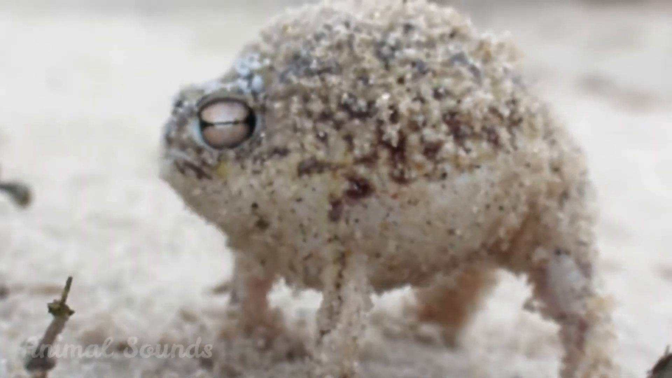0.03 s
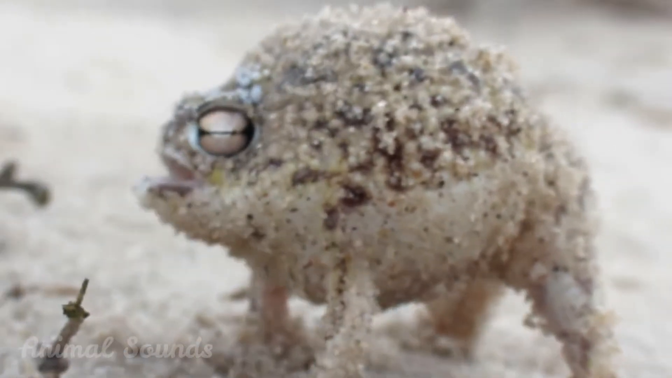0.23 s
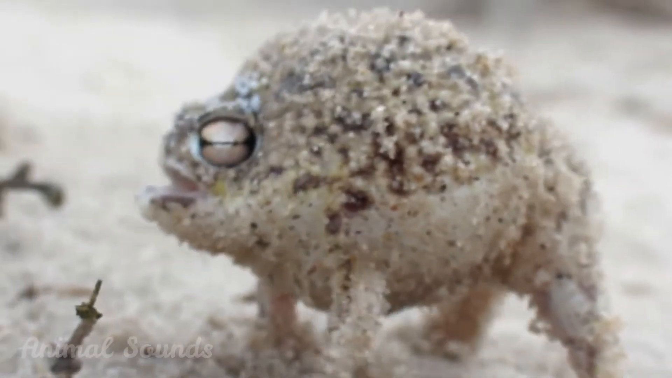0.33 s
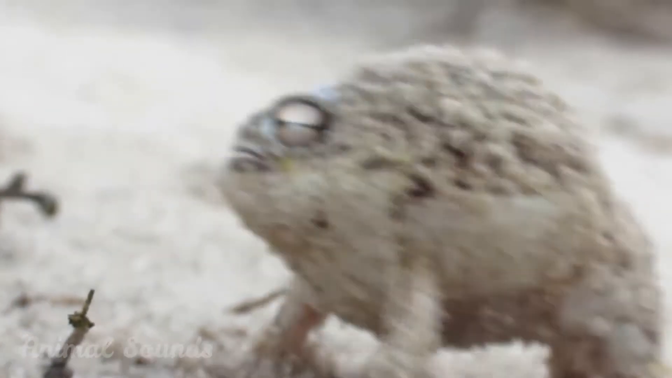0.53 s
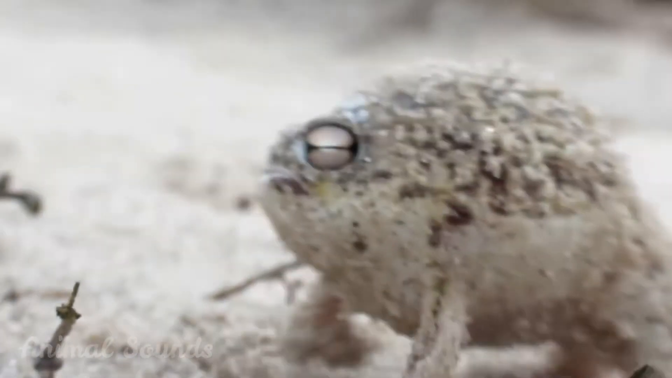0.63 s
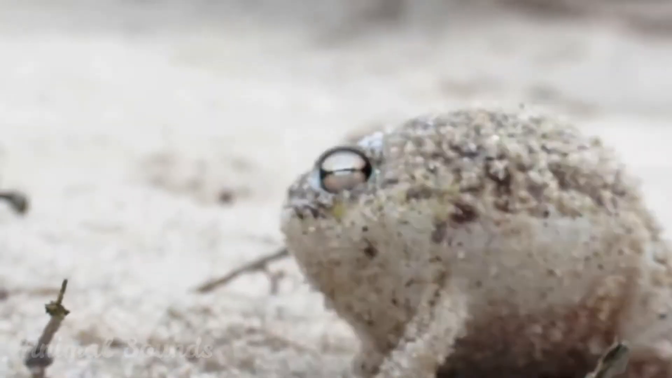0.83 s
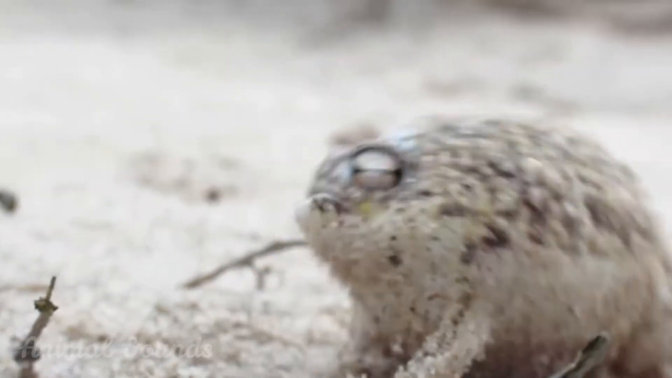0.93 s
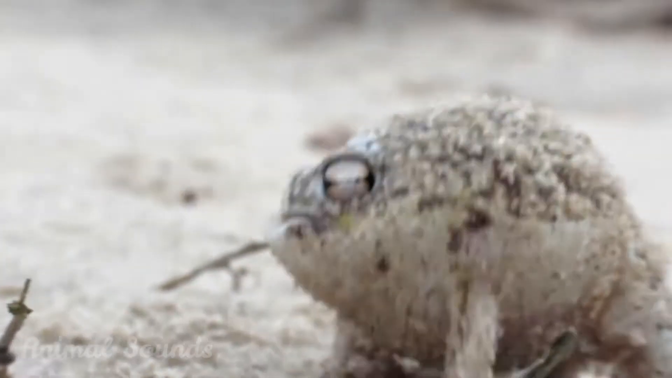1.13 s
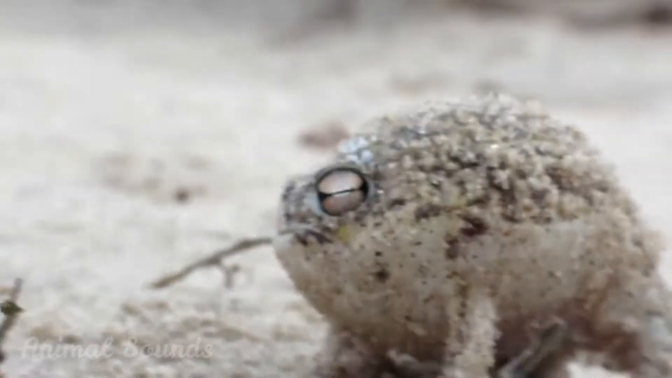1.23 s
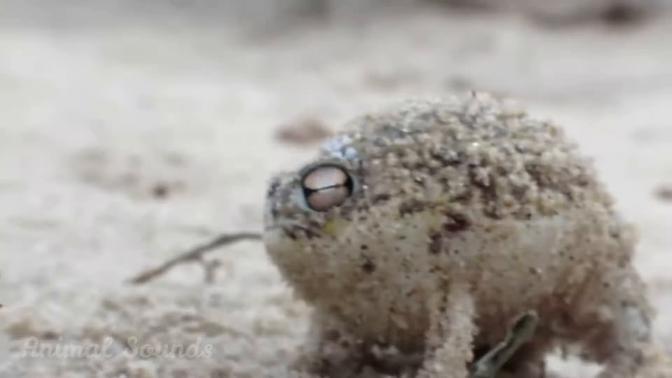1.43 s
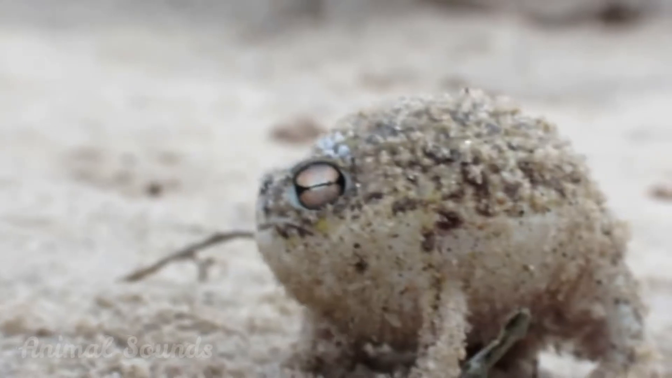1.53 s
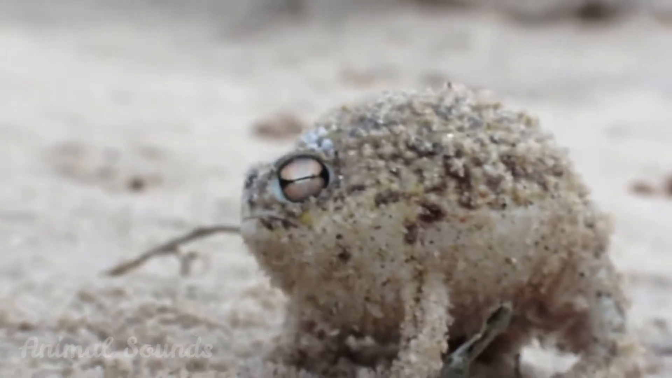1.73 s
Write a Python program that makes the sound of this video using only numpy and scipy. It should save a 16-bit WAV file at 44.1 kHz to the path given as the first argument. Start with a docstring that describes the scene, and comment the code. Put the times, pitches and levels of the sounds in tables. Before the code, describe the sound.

Squeaky-toy cries from a small frog close by: one long, one short, over faint air.

```python
"""Wind thumps on a pair of microphone ports, mostly in opposition, over a far wash of air.
A small frog on open sand, close to the ports, gives a long squeak and then a short one.
Steady vocal pulses ring a narrow mouth resonance that sinks as the mouth closes.
Each squeak ends in a rasp; faint clicks, bursts of noise ringing three resonances, come last."""
import sys
import numpy as np
from scipy import signal
from scipy.fft import rfft, irfft
from scipy.io import wavfile
from scipy.ndimage import uniform_filter1d, minimum_filter1d

SR = 44100
rng = np.random.default_rng(int(sys.argv[2]) if len(sys.argv) > 2 else 0)


def linear_from_db(decibels):
    """Turn decibels (scalar or array-like) into linear amplitude factors; 0 gives 1."""
    return 10 ** (np.asarray(decibels, float) / 20)


def store_pcm(level_fs):
    """Save levels as 16-bit WAV."""
    pcm = np.round(np.clip(level_fs, -1, 1) * 32767).astype(np.int16)
    wavfile.write(sys.argv[1], SR, np.atleast_2d(pcm).T)


N = 77175

# Pulse rate of the vocal folds. Each row: time in seconds, pitch in Hz.
LONG_SQUEAK_PITCH = [(.193, 1475), (.199, 1480), (.204, 1137), (.21, 1043), (.22, 1046), (.244, 1167),
                     (.265, 1218), (.315, 1255), (.34, 1234), (.38, 1178), (.528, 924.4), (.56, 919.7),
                     (.6, 893.3), (.65, 817), (.69, 822.4), (.715, 810.4), (.74, 723), (.765, 661),
                     (.815, 629)]
SHORT_SQUEAK_PITCH = [(1.023, 1138), (1.028, 1317), (1.035, 1325), (1.044, 893), (1.066, 921.3),
                      (1.085, 989.7), (1.11, 1027), (1.14, 1040), (1.17, 1023), (1.2, 950.7), (1.23, 821.7),
                      (1.26, 647.4), (1.285, 621.4), (1.295, 402.3), (1.35, 206)]
# Vocal effort. Each row: time in seconds, relative level in dB, roughness in dB.
VOCAL_EFFORT = [(0.191, -34.5, -2), (.22, -37, -40), (.3, -39, -48), (.6, -39.5, -48), (0.721, -41.5, -42),
                (0.77, -45.5, -32), (.784, -53, 3), (0.816, -64., 3), (1.02, -33.5, -18),
                (1.051, -38.5, -34), (1.14, -35.5, -50), (1.199, -39.5, -42), (1.279, -41, -34),
                (1.297, -45, -13), (1.35, -65, -13)]
# Mouth shape. Each row: time in seconds, resonance in Hz, its gain in dB, opening as treble gain in dB.
MOUTH_SHAPE = [(.19, 6040, -11, -6), (.205, 7020, 11, -2), (0.217, 7375, 27, -1), (.27, 7250, 27.5, -1.5),
               (0.329, 7555, 27.5, 0), (0.402, 7160, 30, -1.5), (0.469, 7155, 21, 5.5),
               (0.516, 6820, 22.5, 3), (0.562, 6370, 24, 0.5), (0.602, 6140, 24, 4.5),
               (0.639, 5590, 25.5, -5), (0.673, 4760, 19.5, -6), (.677, 4270, -14, 5),
               (0.681, 3430, 16.5, -7.5), (0.723, 3130, -0.5, -5.5), (0.788, 1910, 7, -18.5),
               (1.022, 3930, -6.5, -31), (1.037, 3970, 14.5, -10.5), (1.045, 5310, 21, -9),
               (1.061, 6960, 18.5, 5.5), (1.082, 7350, 30, -2), (1.109, 7350, 28.5, 1),
               (1.144, 7200, 22.5, 3), (1.17, 6435, 28, -2), (1.226, 5860, 25.5, -13.5),
               (1.279, 4870, 19, -24), (1.286, 3350, 13.5, -14), (1.31, 2473, 14, -30.5),
               (1.347, 1530, 5, -40)]
# Sound through the body wall. Each row: frequency in Hz, gain in dB.
BODY_GAIN = [(1000, -14.5), (1700, 1.5), (2500, -1.5), (3600, 2.5)]
# Sound through the open mouth. Each row: frequency in Hz, gain in dB before the opening's gain.
OPEN_MOUTH_GAIN = [(3000, -31.5), (6000, 5.5), (8500, -7.5), (9600, -13.5), (12500, -7.5), (14000, -8.5),
                   (15700, 0.5)]
# Pitches that cancel on the way to the ports. Each row: centre in Hz, width in Hz, gain in dB.
PATH_NOTCHES = [(4367, 750, -24.5), (6750, 560, -9), (11370, 400, -11.5)]
# Small mouth or sand clicks. Each row: time in seconds, level in dB of the noise before it rings.
CLICKS = [(1.348, -42), (1.364, -48.5), (1.380, -48), (1.413, -47), (1.467, -43.5)]
# Resonances the clicks ring. Each row: centre in Hz, width in Hz, gain in dB.
CLICK_RESONANCES = [(2105, 110, 21.5), (5000, 660, 3), (6600, 1200, -4.5)]
# Level difference of the ports. Each row: frequency in Hz, left over right in dB.
PORT_LEVEL_DIFFERENCE = [(1500, -1.5), (3200, 2), (9000, -0.5), (13000, -1)]
# Phase difference of the ports. Each row: frequency in Hz, lead of the left in radians.
PORT_PHASE_LEAD = [(1500, 0.015), (3500, 0.86), (5000, 0.25), (7550, 0.43), (8600, 1.45), (15000, .7)]
# Wind puffs on the ports. Each row: time of the peak in seconds, level in dB.
WIND_PUFFS = [(0.029, -15.5), (0.207, -30), (.405, -30), (0.519, -30.5), (0.591, -30.5), (0.651, -29),
              (0.699, -27.5), (0.761, -26.5)]
# Spectral shapes of wind and air. Each row: frequency in Hz, relative density in dB per Hz.
WIND_SPECTRUM = [(15, 7), (45, 3.5), (130, -2), (300, -17), (900, -60.5)]
AIR_SPECTRUM = [(30, -9.5), (75, -3.5), (117, -5), (286, -8), (2100, -28.5), (15800, -46)]
# Likeness of the air in the two ports. Each row: frequency in Hz, left-right correlation.
AIR_CORRELATION = [(60, -0.19), (240, 0.63), (950, 0.12), (15000, 0.09)]

ONSET_S, FADE_S = .002, .012
JITTER = .0004   # rms share of the pitch
CROAK_RAD = 0.82   # rms phase wander of the fundamental at 0 dB roughness
ROUGH_DB_PER_OCTAVE = 14.
FLICKER_DB = 2.0   # rms at 10 kHz, in proportion to frequency
MOUTH_WIDTH_HZ = 238.6
BODY_TOP_HZ, BODY_TOP_SHARE = 4960, 1.07   # upper limit of the body's band; share of the mouth's resonance
THROAT_SHARE, THROAT_WIDTH_HZ, THROAT_DB = 0.803, 2600, 5.5   # share of the mouth's resonance
CLICK_DECAY_S = 0.00095
PUFF_S = .016   # standard deviation of the bell-shaped swell
SHARED_DB = -10.   # wind alike in both ports, relative to the opposed part
AIR_DB, AIR_PATCHY_DB = -49, .6   # level of the part alike in both ports; rms of its slow change
MASK_DB, MASK_REACH_HZ = -35, 750   # threshold under the strongest bin; reach to either side
MASK_LOW_HZ, MASK_TOP_HZ = 1100, 5000
STOP_HZ = 16300.   # attenuation reaches 60 dB here


def at_hz(points, hz):
    """Interpolation on a logarithmic frequency axis, the natural scale of pitch."""
    p = np.array(points)
    return np.interp(np.log(np.maximum(hz, 1)), np.log(p[:, 0]), p[:, 1])


def rms_one(x):
    """Normalisation: division by the root mean square gives unit power."""
    return x / np.sqrt(np.mean(x ** 2) + 1e-20)


def drift(rate_hz, size):
    """Slow random variation: white noise through two equal one-pole low-passes, rms 1."""
    settle = SR // 2
    pole = np.exp(-2 * np.pi * rate_hz / SR)
    noise = rng.standard_normal(size + settle)
    return rms_one(signal.lfilter([1], [1, -2 * pole, pole * pole], noise)[settle:])


def resonance(hz, centre_hz, width_hz):
    """Damped resonator: complex gain of one mode, unity at its centre."""
    return 1 / (1 + 1j * (hz ** 2 - centre_hz ** 2) / (hz * width_hz))


def glide(t, rows):
    """Continuous motion: table columns interpolated in time and averaged over 4 ms."""
    s, *columns = np.transpose(rows)
    return [uniform_filter1d(np.interp(t, s, c), size=180, mode="nearest") for c in columns]


def vocal_tract(hz, mouth_hz, mouth_db, open_db):
    """Parallel radiation: body wall, mouth, open mouth and throat add, then path notches cancel."""
    body_top_hz = np.minimum(BODY_TOP_HZ, BODY_TOP_SHARE * mouth_hz)
    body = linear_from_db(at_hz(BODY_GAIN, hz)) / (1 + (hz / body_top_hz) ** 6)
    mouth = linear_from_db(mouth_db) * resonance(hz, mouth_hz, MOUTH_WIDTH_HZ)
    mouth = mouth / (1 + (hz / (2 * mouth_hz)) ** 6)
    open_mouth = linear_from_db(open_db + at_hz(OPEN_MOUTH_GAIN, hz))
    throat = resonance(hz, THROAT_SHARE * mouth_hz, THROAT_WIDTH_HZ) ** 2
    tract = body + mouth + open_mouth + linear_from_db(THROAT_DB + open_db) * throat
    for notch_hz, width_hz, notch_db in PATH_NOTCHES:
        tract *= 1 - (1 - linear_from_db(notch_db)) * np.abs(resonance(hz, notch_hz, width_hz)) ** 2
    return tract


def squeak(pitch_rows):
    """Source and filter: harmonics of the pulse rate pass the tract; roughness spreads noise around each."""
    start, end = int(pitch_rows[0][0] * SR), int(pitch_rows[-1][0] * SR)
    t = np.arange(start, end) / SR
    size = len(t)
    pitch, = glide(t, pitch_rows)
    f0 = pitch * (1 + JITTER * drift(72.0, size))
    mouth_hz, mouth_db, open_db = glide(t, MOUTH_SHAPE)
    level_db, rough_db = glide(t, VOCAL_EFFORT)
    ramp = np.minimum((t - t[0]) / ONSET_S, (t[-1] - t) / FADE_S)
    gain = 2 * linear_from_db(level_db) * np.clip(ramp, 0, 1)

    # Pulses come early or late when the voice is rough.
    uneven = CROAK_RAD * linear_from_db(rough_db) * drift(220.0, size)
    phase = 2 * np.pi * np.cumsum(f0) / SR + uneven
    out = np.zeros(N)
    for k in range(1, 36):
        hz = k * f0
        tract = vocal_tract(hz, mouth_hz, mouth_db, open_db)
        flicker = linear_from_db(FLICKER_DB * hz / 1e4 * drift(25., size))
        spread = linear_from_db(np.minimum(rough_db + ROUGH_DB_PER_OCTAVE * np.log2(hz / 3000), 0))
        rasp = spread * (drift(500., size) + 1j * drift(500., size))
        harmonic = np.real(gain * tract * (flicker + rasp) * np.exp(1j * k * phase))
        out[start:start + size] += harmonic * (hz < .4 * SR)
    return out


def ticks():
    """Impulsive excitation: noise that starts abruptly and dies at once rings three resonances."""
    t = np.arange(N) / SR
    hz = np.fft.rfftfreq(N, 1 / SR) + 1   # 1 Hz up avoids division by zero
    level = sum(linear_from_db(db) * (t > s) * np.exp(-np.abs(t - s) / CLICK_DECAY_S) for s, db in CLICKS)
    rings = sum(linear_from_db(db) * resonance(hz, centre_hz, width_hz)
                for centre_hz, width_hz, db in CLICK_RESONANCES)
    return irfft(rfft(level * rng.standard_normal(N)) * rings, N)


def at_ports(x):
    """Spaced reception: two ports hear one source with small differences in level and phase."""
    hz = np.fft.rfftfreq(N, 1 / SR)
    level = linear_from_db(at_hz(PORT_LEVEL_DIFFERENCE, hz) / 2)
    tilt = level * np.exp(.5j * at_hz(PORT_PHASE_LEAD, hz))
    return irfft(rfft(x) * np.array([tilt, 1 / tilt]), N)


def coloured(spectrum):
    """Spectral shaping: white noise weighted by a spectrum above 15 Hz, rms 1."""
    hz = np.fft.rfftfreq(N, 1 / SR)
    white = rfft(rng.standard_normal(N))
    return rms_one(irfft(white * linear_from_db(at_hz(spectrum, hz)) * (hz > 15), N))


def wind():
    """Turbulent pressure: short puffs of low noise push the ports mostly against each other."""
    t = np.arange(N) / SR
    level = sum(linear_from_db(db) * np.exp(-.5 * ((t - s) / PUFF_S) ** 2) for s, db in WIND_PUFFS)
    shared = linear_from_db(SHARED_DB) * coloured(WIND_SPECTRUM)
    opposed = coloured(WIND_SPECTRUM) * [[1], [-1]]
    return level * (shared + opposed)


def air():
    """Partial coherence: a slightly patchy far wash sums noise alike and opposed in the ports."""
    hz = np.fft.rfftfreq(N, 1 / SR)
    alike = np.clip(at_hz(AIR_CORRELATION, hz), -.9, .9)
    side_gain = np.sqrt((1 - alike) / (1 + alike))
    side = irfft(rfft(coloured(AIR_SPECTRUM)) * side_gain, N)
    level = linear_from_db(AIR_DB + AIR_PATCHY_DB * drift(24.0, N))
    return level * (coloured(AIR_SPECTRUM) + side * [[1], [-1]])


def scene():
    """Superposition: frog and clicks reach both ports, where wind and air add."""
    frog = squeak(LONG_SQUEAK_PITCH) + squeak(SHORT_SQUEAK_PITCH)
    return at_ports(frog + ticks()) + wind() + air()


def mask_weak_bins(x):
    """Spectral masking: between two band edges, bins far under the strongest one nearby are emptied."""
    hz, _, spec = signal.stft(x, SR, nperseg=1024)
    power = np.mean(np.abs(spec) ** 2, axis=0)
    strongest = -minimum_filter1d(-power, size=int(2 * MASK_REACH_HZ / hz[1]), axis=0)
    limit = strongest * linear_from_db(MASK_DB) ** 2
    in_band = ((hz > MASK_LOW_HZ) & (hz < MASK_TOP_HZ))[:, None]
    masked = in_band / (1 + (power / (limit + 1e-20)) ** 2)
    return signal.istft(spec * (1 - masked), SR)[1][:, :N]


def top_cut(x):
    """Nothing passes above the cut-off."""
    return signal.sosfilt(signal.butter(12, 16510, fs=SR, output="sos"), x)


def record(dry):
    """Masking and band limitation: weak bins near strong tones are emptied, then a low-pass cuts the top."""
    low_pass = signal.cheby2(12, 60, STOP_HZ, fs=SR, output="sos")
    mix = signal.sosfilt(low_pass, mask_weak_bins(dry))
    return top_cut(mix)


dry = scene()
out = record(dry)
store_pcm(out)
```